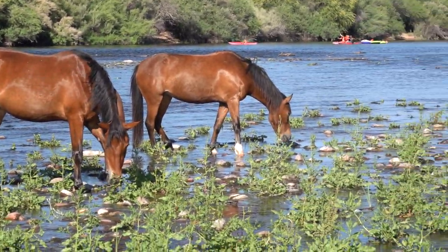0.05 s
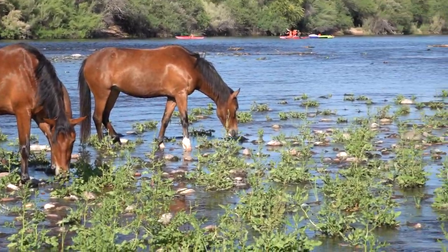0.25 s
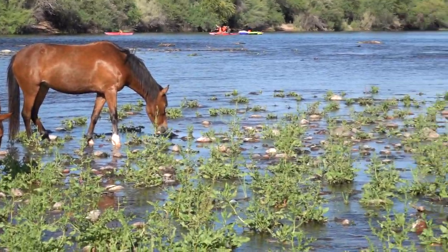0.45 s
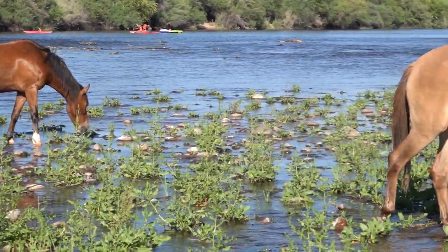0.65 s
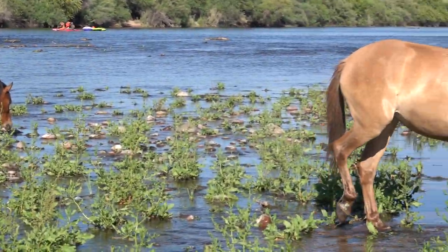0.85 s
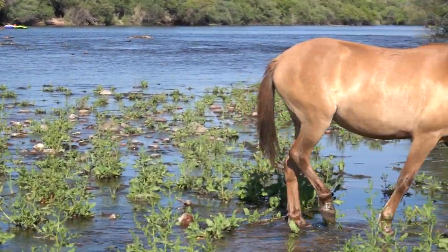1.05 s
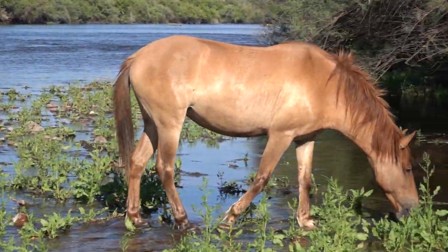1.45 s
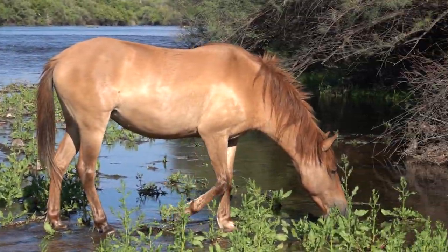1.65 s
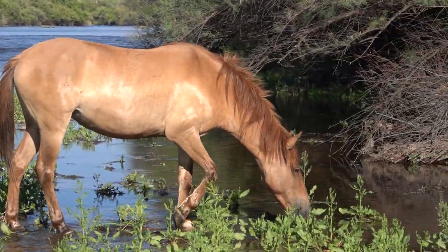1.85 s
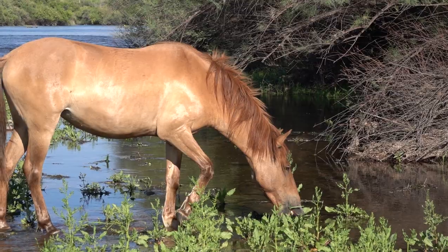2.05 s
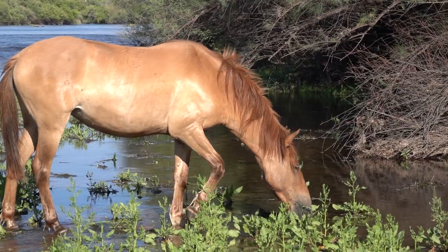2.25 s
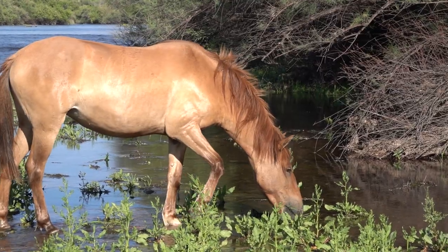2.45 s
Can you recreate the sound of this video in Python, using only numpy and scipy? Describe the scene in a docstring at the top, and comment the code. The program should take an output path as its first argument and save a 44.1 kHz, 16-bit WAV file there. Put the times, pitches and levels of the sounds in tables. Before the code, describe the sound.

A steady, high-pitched cicada buzz carries across a riverbank over gently washing water. Hooves splash and plop lightly in the shallows, then a strong gust thumps against the microphone, briefly covering everything before it eases.

```python
"""Cicadas and horses at a shallow river.

Stereo microphone by the water. Two cicadas buzz in the bushes, each a quick train of thin arching
whistles, the farther one lower and slower. Horses wade and graze: hooves make small splashes and plops
over the wash of the current, and water trickles off a muzzle. Wind buffets the microphone, and the
strongest gust makes the limiter duck everything."""
import sys
import numpy as np
from scipy import signal
from scipy.fft import rfft, irfft
from scipy.io import wavfile
from scipy.ndimage import uniform_filter1d

SR = 44100
rng = np.random.default_rng(int(sys.argv[2]) if len(sys.argv) > 2 else 0)


def master_out(mix):
    """Clip the mix to full scale and print it as 16-bit PCM to the path in sys.argv[1]."""
    frames = np.transpose(np.atleast_2d(mix))
    ceiling = np.clip(frames, -1, 1)
    pcm = np.round(ceiling * 32767).astype(np.int16)
    wavfile.write(sys.argv[1], SR, pcm)


N = 110250

# Runs of song, near and far cicada: start_s, end_s, syllables_per_s
NEAR_RUNS = [(0.016, 1.48, 46.73), (1.505, 2.29, 46.6), (2.303, 2.52, 47.6)]
FAR_RUNS = [(0.0135, 2.52, 45.11)]
# Syllable shape, near then far: top_hz, rise_s, fall_s, drop_hz, relative_db
SYLLABLES = [(10100, .0095, .0115, 1500, -3.5), (9367, .011, 0.009, 1450, -11.5)]
# Buzz at the microphone, before band trims: time_s, top_db, middle_db, low_db
BUZZ_LEVELS = [(0.0, -69, -74, -52), (0.04, -57, -61, -63), (0.89, -52, -62.5, -61.5),
               (1.1, -53.5, -55.5, -73), (1.23, -55, -55, -66), (1.43, -52, -56, -69),
               (1.49, -64, -74, -64), (1.5, -54.5, -64, -65.5), (1.71, -61, -59.5, -63),
               (1.75, -54.5, -57.5, -71), (1.88, -63, -53.5, -69), (2.21, -58, -56.5, -69),
               (2.25, -77, -52, -65), (2.29, -69, -64, -63), (2.31, -62.5, -60, -67.5),
               (2.5, -66.5, -54, -62)]
BAND_SPLIT_HZ = (9450, 9880)
BAND_TRIM_DB, BAND_LEFT_BIAS_DB = (1, -1.5, 1.5), (3.5, 2, 0)  # top, middle, low

# Bubbles from hooves: start_s, level_db, pitch_hz, decay_s, glide_octaves_per_s
PLOPS = [(.064, -30.5, 950, 0.0036, 7), (0.084, -37, 880, 0.0096, 20.5), (.137, -35, 880, .008, -13),
         (.163, -32, 914, 0.0073, 5), (.676, -24, 900, 0.0027, 37), (.718, -32, 837, 0.0039, 2),
         (0.735, -35, 1860, 0.0026, 14), (0.743, -29.5, 620, 0.0039, -32), (1.278, -35, 1365, 0.0041, 32),
         (1.307, -23.5, 724, 0.0035, 150), (1.345, -33.5, 966, 0.0046, 15), (1.393, -36.5, 634, 0.015, 8),
         (1.436, -35, 830, 0.0046, 14), (1.459, -29.5, 786, 0.011, 29), (1.474, -36, 1050, 0.0021, 46),
         (2.48, -47.5, 3400, 0.0041, 0)]
# Hoof splashes: start_s, relative_db, decay_s, spray_db
SPLASHES = [(.027, -43, 0.0019, -1), (0.034, -35, 0.0064, -9.5), (0.047, -38, 0.0032, -19),
            (0.253, -72, 0.0044, 11), (0.29, -54, 0.0058, 3), (0.595, -41, .012, -7),
            (0.761, -41, 0.005, -7), (0.999, -61.5, 0.0079, 5.5), (1.277, -34.5, 0.0079, -4),
            (2.141, -53, .004, -9), (2.23, -75, 0.022, 9.5)]
# Water off a muzzle: time_s, level_db
TRICKLE_LEVELS = [(0, -68), (.15, -73.5), (.3, -64), (.5, -75.5), (.78, -65.5), (.9, -81), (2.5, -97.5)]
# The current, before trims: time_s, wash_db, hiss_db
CURRENT_LEVELS = [(0, -51, -69), (.19, -46, -66.5), (.43, -49.5, -70.5), (.95, -47.5, -72),
                  (1.22, -48.5, -68.5), (1.3, -47.5, -60), (1.5, -45.5, -64.5), (1.72, -47, -62.5),
                  (1.9, -45.5, -67), (2.17, -48, -68), (2.33, -49, -66.5), (2.5, -51.5, -61.5)]
# Spectra of the water sounds: frequency_hz, relative_db
SPLASH_COLOUR = [(400, -32), (1300, 7), (2100, 8), (3200, -6.5), (4400, 0), (5400, 7.5), (6800, -4),
                 (11000, 2), (14000, -6.5), (15500, -13)]
TRICKLE_COLOUR = [(3000, -23), (4400, 5), (5300, 6), (6200, -2.5), (7500, -33.5)]
WASH_COLOUR = [(150, 1), (400, -2), (650, -7.5), (950, 0.5), (1300, -5.5), (1650, -6), (2400, -15),
               (3000, -29), (4500, -40.5)]
HISS_COLOUR = [(1500, 3.5), (3000, 7), (4200, 1), (6000, 0.5), (7500, -6.5), (11000, -7), (14500, -10.5),
               (16500, -24.5)]
# Likeness of left and right channels: frequency_hz, correlation
WATER_LIKENESS = [(300, 1), (1000, 0.87), (2400, 0.56), (6000, .5), (15000, 0.35)]
WIND_LIKENESS = [(50, 1), (250, .95), (700, 0.66)]

# Wind on the microphone, before the flutter trim: time_s, rumble_db, flutter_db
GUSTS = [(0.0, -37, -75), (0.14, -36.5, -66), (0.3, -24, -44.5), (0.39, -35.5, -53.5), (0.71, -33, -65),
         (0.75, -30, -40), (0.81, -31, -55.5), (1.04, -36.5, -63.5), (1.34, -31.5, -62),
         (1.48, -22.5, -36.5), (1.59, -29.5, -55), (1.61, -24.5, -44), (1.66, -26.5, -60.5),
         (1.69, -17.5, -27.5), (1.75, -15.5, -16.5), (1.98, -16, -31.5), (1.99, -21, -40),
         (2.01, -27.5, -23), (2.04, -23.5, -48.5), (2.09, -18, -40.5), (2.19, -32, -55),
         (2.33, -38.5, -55.5), (2.5, -49.5, -42)]
# Spectra of the wind: frequency_hz, relative_db
RUMBLE_COLOUR = [(15, -34), (25, -11.5), (45, -1), (85, 1.5), (170, -1.5), (230, -8), (330, -19),
                 (500, -37.5), (900, -87)]
FLUTTER_COLOUR = [(100, -12), (200, -2), (310, -1.5), (420, -8.5), (560, -16.5), (750, -23.5), (1200, -56),
                  (2500, -85)]
# Single eddies thumping the microphone: centre_s, level_db, pitch_hz
EDDIES = [(0.299, -18.5, 198), (0.557, -22, 105), (0.591, -27, 103), (0.91, -21, 109.3),
          (1.618, -9.5, 154.5), (1.741, -1, 306), (1.808, -8, 408), (1.869, -3, 360), (1.922, -8.5, 135),
          (1.963, -9, 381), (2.014, -13, 325), (2.31, -27.5, 48)]
# Wind phase between the ports: frequency_hz, left_lead_rad
WIND_PHASE = [(20, 0.63), (65, -0.48), (150, -0.78), (250, -1.15), (370, -1.31), (550, -1.47)]

SIDES = np.array([[1], [-1]])  # left, right
BIN_HZ = np.fft.rfftfreq(N, 1 / SR)


def whistle(top_hz, rise_s, fall_s, drop_hz):
    """One cicada syllable: sweeps up, lingers at the top and sweeps down, fading at both ends."""
    t = np.arange(-int(rise_s * SR), int(fall_s * SR)) / SR
    from_top = abs(t) / np.where(t < 0, rise_s, fall_s)
    cycles = np.cumsum(top_hz - drop_hz * from_top ** 1.875) / SR
    envelope = amp(-14.5 * from_top ** 2) * np.minimum((1 - from_top) * 10, 1)
    return envelope * np.sin(2 * np.pi * cycles)


def cicadas(jitter_s=.00003, left_lead_rad=-1.14):
    """Two cicadas drift in and out of step in the bushes; their colour shifts as the microphone turns."""
    song = np.zeros(N)
    for runs, (top_hz, rise_s, fall_s, drop_hz, db) in zip((NEAR_RUNS, FAR_RUNS), SYLLABLES):
        for start_s, end_s, rate in runs:
            for top_s in np.arange(start_s, end_s, 1 / rate):
                late, sharp, loud = rng.standard_normal(3)
                syllable = whistle(top_hz + 13 * sharp, rise_s, fall_s, drop_hz)
                add(song, top_s - rise_s + jitter_s * late, amp(db + 1.05 * loud) * syllable)
    direct = (signal.hilbert(song) * np.exp(.5j * left_lead_rad * SIDES)).real
    bushes = amp(-6.5) * scatter(song, t60_s=.098)
    spectrum = rfft(direct + bushes)
    above_low, top = (.5 + .5 * np.tanh((BIN_HZ - edge_hz) / 90) for edge_hz in BAND_SPLIT_HZ)
    buzz = np.zeros((2, N))
    for k, band in enumerate((top, above_low - top, 1 - above_low)):
        gain = amp(BAND_TRIM_DB[k] + BAND_LEFT_BIAS_DB[k] * SIDES / 2) * level(BUZZ_LEVELS, column=k + 1)
        buzz += gain * unit_rms(irfft(spectrum * band, N))
    return buzz


def bubble(db, pitch_hz, decay_s, octaves_per_s, rise_s=.00086):
    """A short damped tone that glides as the bubble nears the surface."""
    t = np.arange(0, 6 * decay_s, 1 / SR)
    cycles = np.cumsum(pitch_hz * 2 ** (octaves_per_s * np.minimum(t, 2 * decay_s))) / SR
    envelope = np.minimum(t / rise_s, 1) * np.exp(-t / decay_s)
    return amp(db) * envelope * np.sin(2 * np.pi * cycles)


def splash(db, decay_s, spray_db, rise_s=.0014, spray_hz=6440):
    """A grainy burst of droplets, with more or less fine spray on top."""
    t = np.arange(8192) / SR
    burst = noise(SPLASH_COLOUR, WATER_LIKENESS, size=len(t))
    tilt_db = curve_at([(spray_hz / 2, 0), (spray_hz * 2, spray_db * 2)], np.fft.rfftfreq(len(t), 1 / SR))
    grain_db = -1.5 * unit_rms(uniform_filter1d(rng.standard_normal(len(t)), size=30))
    envelope = np.minimum(t / rise_s, np.exp(-(t - rise_s) / decay_s))
    return amp(db) * irfft(rfft(burst) * amp(tilt_db)) * unit_rms(amp(grain_db)) * envelope


def wading(ripples_per_s=62, low_hz=640, high_hz=2180):
    """Hooves plop and splash among small random ripples, with a little echo from the bank."""
    water = np.zeros((2, N))
    for start_s, *plop in PLOPS:
        add(water, start_s, bubble(*plop))
    for start_s, *burst in SPLASHES:
        add(water, start_s, splash(*burst))
    bank_echo = amp(-13) * scatter(water, t60_s=.16)
    for when, size, pitch, pan in rng.random((int(ripples_per_s * N / SR), 4)):
        pitch_hz = low_hz * (high_hz / low_hz) ** pitch
        ripple = bubble(-48.5 + 10 * size ** 2 - 6 * pitch, pitch_hz, decay_s=.0022, octaves_per_s=26)
        add(water, when * N / SR, ripple * np.array([[.5 + pan], [1.5 - pan]]))
    return water + bank_echo


def muzzle_trickle():
    """A fine trickle of water running off a horse's muzzle."""
    drips = noise(TRICKLE_COLOUR, WATER_LIKENESS) * flicker(rate_hz=160, depth_db=4)
    return drips * level(TRICKLE_LEVELS, column=1)


def wind():
    """Lumpy rumble, rougher flutter in the gusts and single thumps, reaching the right port first."""
    rumble = noise(RUMBLE_COLOUR, WIND_LIKENESS) * flicker(rate_hz=21.6, depth_db=2)
    flutter = amp(4.5) * noise(FLUTTER_COLOUR, WIND_LIKENESS) * flicker(rate_hz=45, depth_db=2)
    air = rumble * level(GUSTS, column=1) + flutter * level(GUSTS, column=2)
    t = np.arange(-2048, 2048) / SR
    for centre_s, db, pitch_hz in EDDIES:
        envelope = np.exp(-abs(t * pitch_hz / .66) ** 1.05)  # 1/e at 0.66 cycles from the centre
        thump = amp(db) * envelope * np.sin(2 * np.pi * (pitch_hz * t + rng.random()))
        add(air, centre_s + t[0], thump)
    left_lead_rad = curve_at(WIND_PHASE, BIN_HZ)
    return irfft(rfft(air) * np.exp(.5j * left_lead_rad * SIDES), N)


def river():
    """The wash of the current with a faint hiss above it."""
    wash = amp(3) * noise(WASH_COLOUR, WATER_LIKENESS) * flicker(rate_hz=30, depth_db=1.45)
    hiss = amp(1.5) * noise(HISS_COLOUR, WATER_LIKENESS) * flicker(rate_hz=91, depth_db=2)
    return wash * level(CURRENT_LEVELS, column=1) + hiss * level(CURRENT_LEVELS, column=2)


def scatter(sound, t60_s):
    """A short diffuse outdoor tail, different in each channel."""
    t = np.arange(SR // 4) / SR
    tail = rng.standard_normal((2, len(t))) * np.exp(-np.log(1000) * t / t60_s)
    return signal.fftconvolve(np.atleast_2d(sound), tail / np.linalg.norm(tail[0]), axes=1)[:, :N]


def noise(colour, likeness, size=N):
    """Stereo noise with a given spectrum and left-right likeness."""
    hz = np.fft.rfftfreq(size, 1 / SR)
    mid, side = rfft(rng.standard_normal((2, size)))
    correlation = np.clip(curve_at(likeness, hz), -1, 1)
    mid, side = mid * np.sqrt(1 + correlation), side * np.sqrt(1 - correlation)
    spectrum = np.array([mid + side, mid - side]) * amp(curve_at(colour, hz))
    return unit_rms(irfft(spectrum, size))


def flicker(rate_hz, depth_db):
    """A random gain that wanders at up to about the given rate."""
    wander = irfft(rfft(rng.standard_normal(N)) * np.exp(-(BIN_HZ / rate_hz) ** 2), N)
    return unit_rms(amp(depth_db * unit_rms(wander)))


def amp(db):
    """Decibels to gain."""
    return 10 ** (np.asarray(db) / 20)


def unit_rms(x):
    """Scales to rms 1."""
    return x / np.sqrt(np.mean(abs(x) ** 2) + 1e-20)


def curve_at(points, hz):
    """Reads a curve on a log-frequency axis."""
    point_hz, value = np.transpose(points)
    return np.interp(np.log(hz + 1), np.log(point_hz + 1), value)


def level(table, column):
    """One dB column of a table as a gain per sample."""
    rows = np.array(table)
    return amp(np.interp(np.arange(N) / SR, rows[:, 0], rows[:, column]))


def add(mix, start_s, sound):
    """Mixes a sound in at start_s, cut to fit."""
    at = int(round(start_s * SR))
    sound = sound[..., max(-at, 0):]
    part = mix[..., max(at, 0):][..., :sound.shape[-1]]
    part += sound[..., :part.shape[-1]]


def scene():
    """The riverside as it reaches the microphone."""
    return wind() + river() + muzzle_trickle() + cicadas() + wading()


def record(dry, limit_db=-8, recovery_db_per_s=26.5, cutoff_hz=15750):
    """The recorder's limiter ducks at once on wind peaks and recovers slowly; a low-pass follows."""
    over_db = np.maximum(20 * np.log10(abs(dry).max(0) + 1e-9) - limit_db, 0)
    recovery_db = np.arange(N) * recovery_db_per_s / SR
    held_db = np.maximum.accumulate(over_db + recovery_db) - recovery_db
    duck_db = uniform_filter1d(held_db, size=90)
    lowpass = signal.firwin(511, cutoff_hz, window=("kaiser", 9), fs=SR)
    return signal.oaconvolve(dry * amp(-duck_db), lowpass[None], "same")


dry = scene()
out = record(dry)
master_out(out)
```